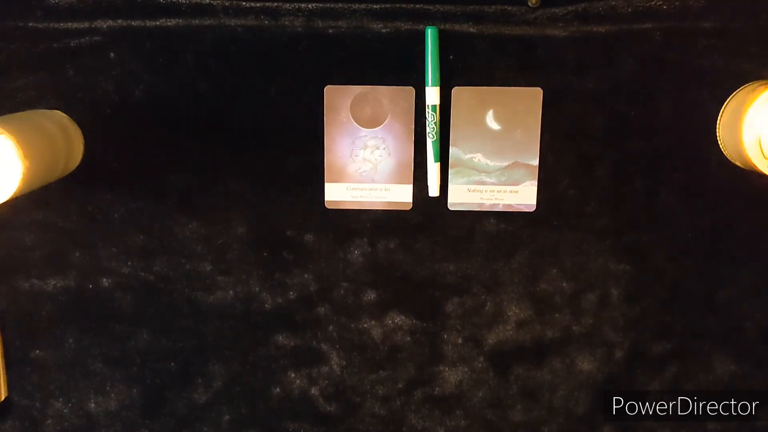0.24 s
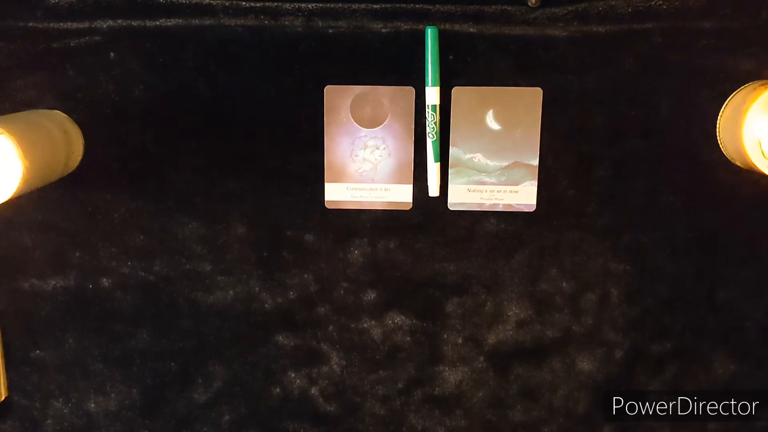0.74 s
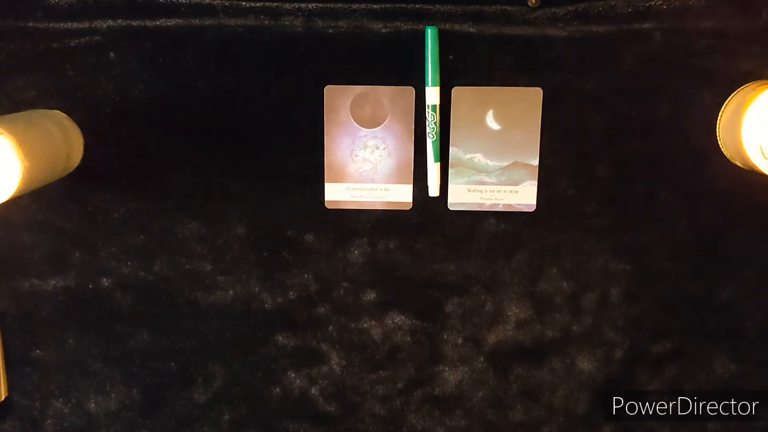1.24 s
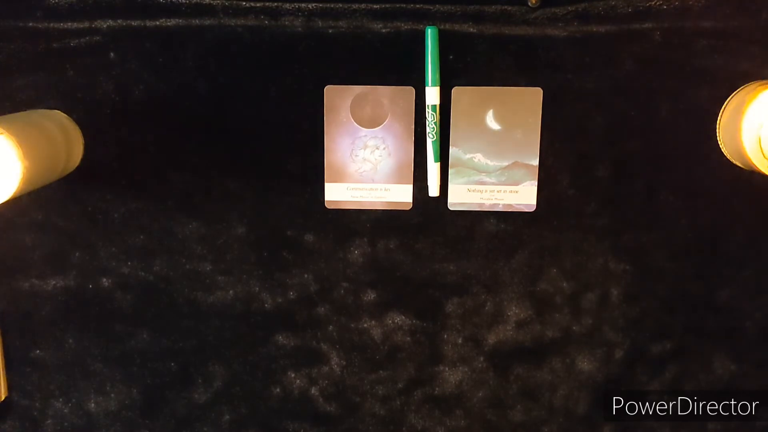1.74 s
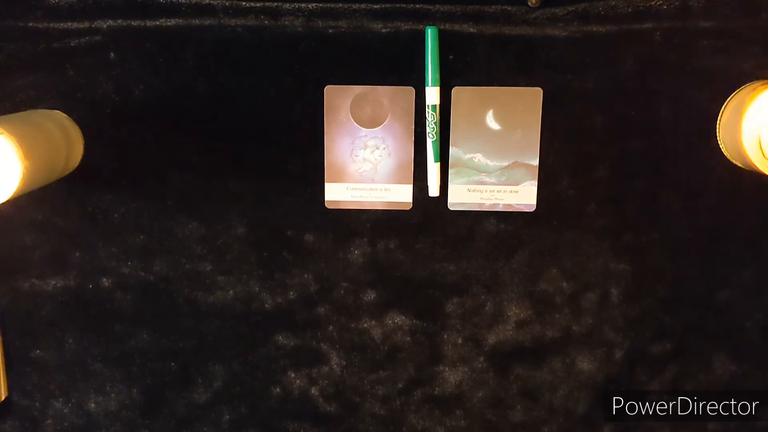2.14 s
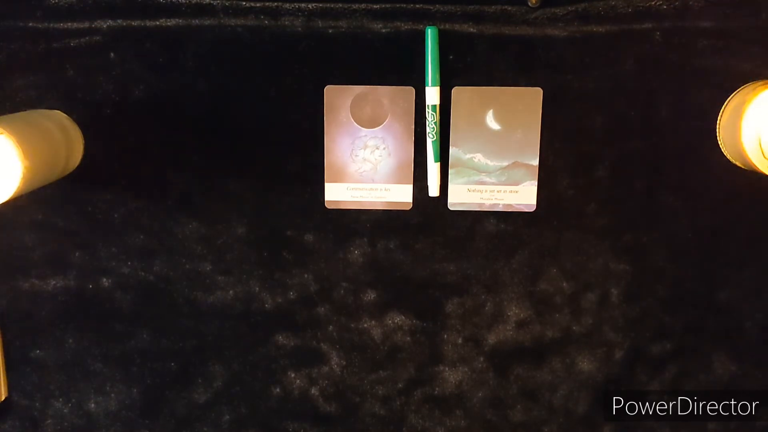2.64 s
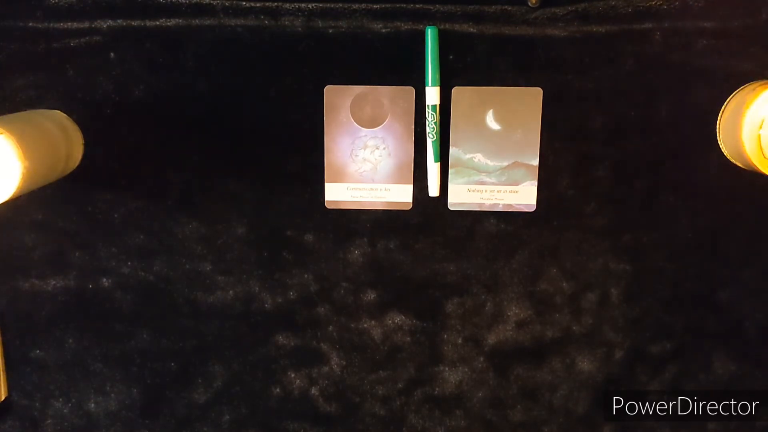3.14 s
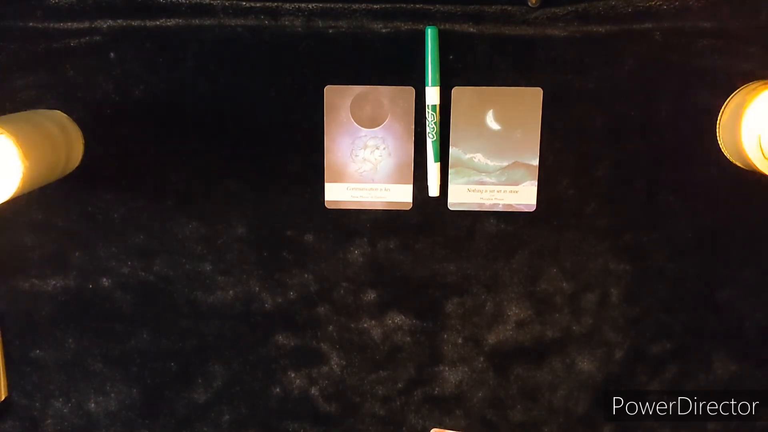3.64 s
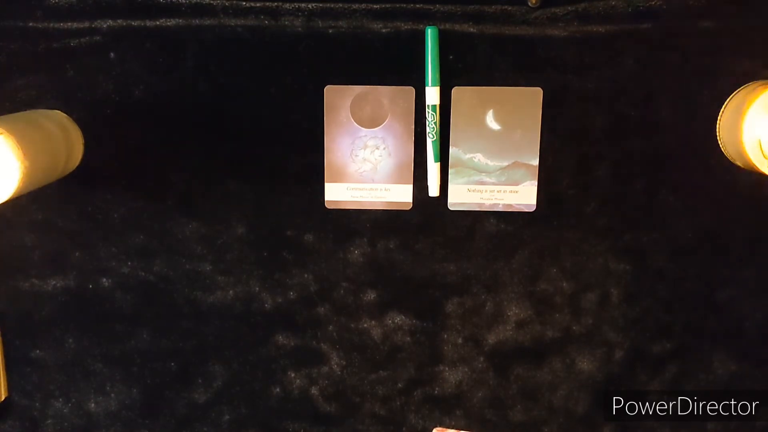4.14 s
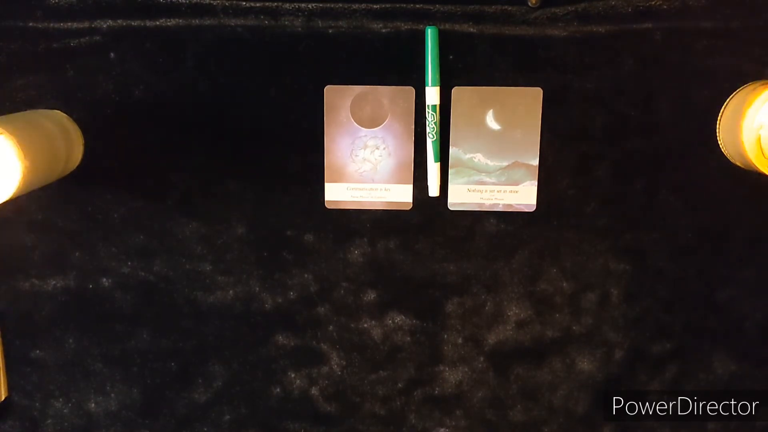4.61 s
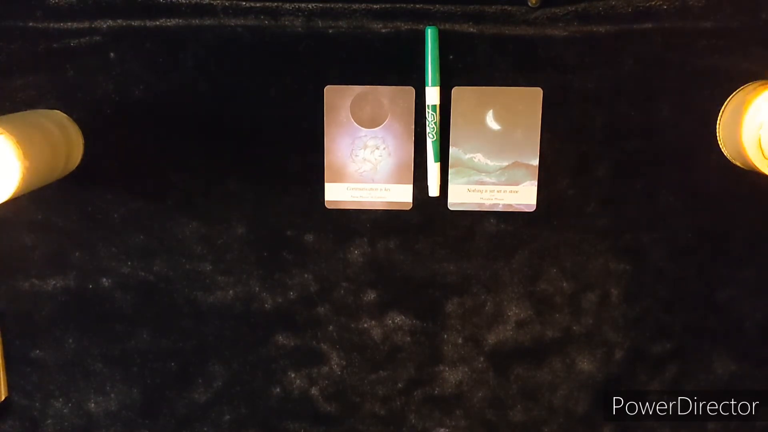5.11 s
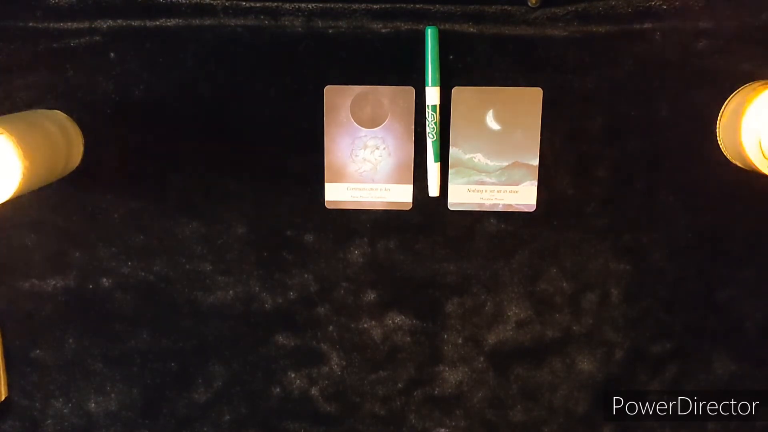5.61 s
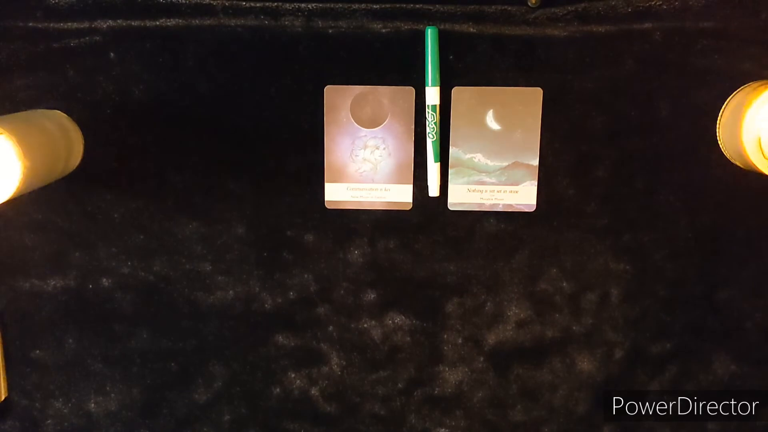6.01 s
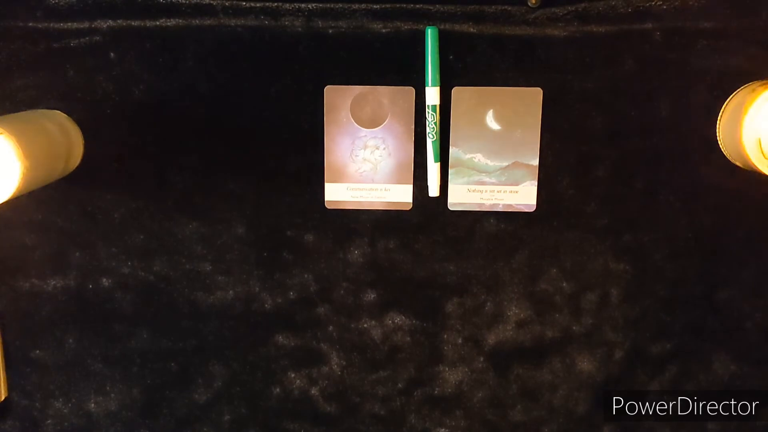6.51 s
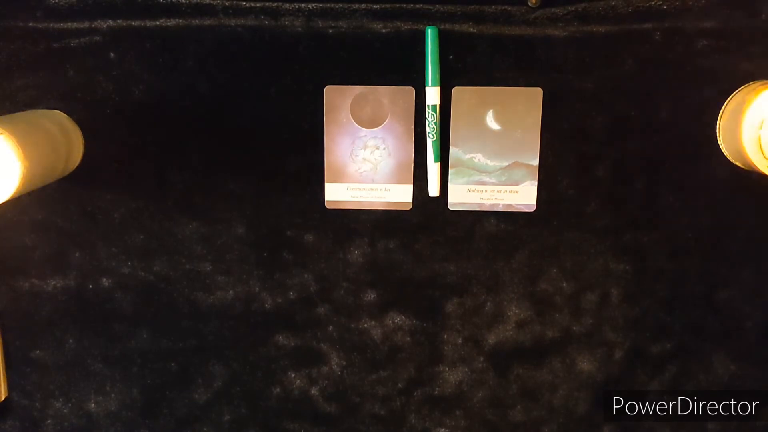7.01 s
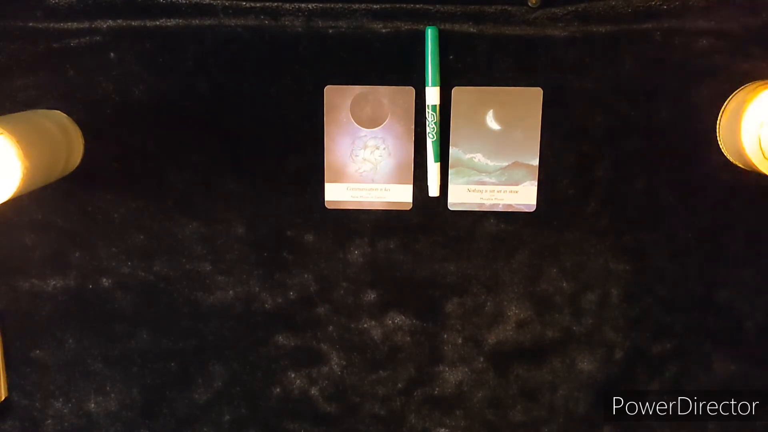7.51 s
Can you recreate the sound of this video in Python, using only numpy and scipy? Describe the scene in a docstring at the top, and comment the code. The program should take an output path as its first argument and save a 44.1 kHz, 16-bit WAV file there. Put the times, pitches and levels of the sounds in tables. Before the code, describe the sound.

Hands shuffle cards very near a two-sided microphone. Quiet rustling and isolated edge ticks come first, over a low ventilation murmur. Midway a burst of bright, irregular ticks riffles past, followed by a sliding push and flat slaps. After a soft thump and light brushing, muffled puffs of air wobble between left and right while the deck is squared with dull wooden knocks on a cloth-covered table. The small room gives a short, dry reverberation.

```python
"""A deck of cards is shuffled by hand in a quiet furnished room, close to a two-port microphone.
Throughout, a ventilation murmur with a faint hum lies below; fingers brush the cards and air puffs at the ports.
Lone edge snaps, rubbed and slapped faces and a light knock lead into a dense riffle: edges tick, packets drop
and slide together. A soft hand lands, more puffs swing the membranes, and three knocks square the deck.
Ticks and knocks are clicks into resonances, friction is stuttering noise, puffs and the hand are short sine swells."""
import sys
import numpy as np
from scipy import signal
from scipy.io import wavfile

SR = 44100
rng = np.random.default_rng(int(sys.argv[2]) if len(sys.argv) > 2 else 0)


def wrap_up_sound(samples):
    """Save the sound to the file named by the first command line argument, as 16-bit audio."""
    columns = np.atleast_2d(samples).T
    # keep every value between -1 and 1, then stretch to whole-number steps
    tamed = np.clip(columns, -1, 1)
    steps = np.round(tamed * 32767).astype(np.int16)
    wavfile.write(sys.argv[1], SR, steps)


N = 342216   # samples
# Levels in the event tables are set before each layer's own trim.


def from_db(db):
    """Decibels to gain."""
    return 10 ** (np.asarray(db) / 20)


def rms_one(x):
    """Scale to rms 1."""
    return x / np.sqrt(np.mean(x ** 2) + 1e-20)


def in_time(rows):
    """Interpolate the columns of a curve at every sample; the first column is t/s."""
    t, *columns = np.transpose(rows)
    return [np.interp(np.arange(N) / SR, t, column) for column in columns]


def in_span(table):
    """Follow the columns of a table; the first, in dB, drops to silence just outside it."""
    first, last = table[0], table[-1]
    before = (first[0] - .04, -120, *first[2:])
    after = (last[0] + .04, -120, *last[2:])
    return in_time([before, *table, after])


def at_hz(points, hz):
    """Read a spectrum on a log frequency axis."""
    f, value = np.array(points).T
    return np.interp(np.log(hz), np.log(f), value)


def drift(rate_hz):
    """Slow noise of spread 1, low-passed by two equal poles at rate_hz."""
    pole = np.exp(-80 * np.pi * rate_hz / SR)   # made at SR / 40, then interpolated
    white = rng.standard_normal(N // 40 + 2002)
    slow = signal.lfilter([1], [1, -2 * pole, pole * pole], white)[2000:]
    return np.interp(np.arange(N) / 40, np.arange(len(slow)), rms_one(slow))


def body(x, modes, turn=-1):
    """Parallel resonances, mode k weighted by turn ** k; a unit click peaks at 1."""
    def bank(v):
        out = 0
        for k, (hz, width_hz, level_db) in enumerate(modes):
            r = np.exp(-np.pi * width_hz / SR)
            poles = [1, -2 * r * np.cos(2 * np.pi * hz / SR), r * r]
            ring = (1 - r * r) * signal.lfilter([1, 0, -1], poles, v + 1e-18)
            out = out + turn ** k * from_db(level_db) * ring
        return out
    unit_click = np.eye(1, 2000)[0]
    return bank(x) / np.abs(bank(unit_click)).max()


def clicks(seconds, level_db, contact_ms):
    """Contacts: a click, then a dying scatter that differs at each port; longer contact blunts the click."""
    out, at = np.zeros((2, N)), np.round(seconds * SR).astype(int)
    step = np.arange(500)
    contact_ms = np.clip(contact_ms + 0 * seconds, 1e-3, 4)[:, None, None]
    luck = rng.standard_normal((len(at), 3, len(step)))
    own, shared = luck[:, :2], luck[:, 2:]
    touch = .3 * (own + shared) * np.exp(-step / (contact_ms * SR / 1000))
    touch[:, :, :1] = np.sign(shared[:, :, :1]) / (1 + 2 * contact_ms)
    for ch in range(2):
        np.add.at(out[ch], at[:, None] + step, from_db(level_db)[:, None] * touch[:, ch])
    return out


def strokes(seconds, level_db, rise_s, fall_db_per_s):
    """Gain of strokes that swell by 29.5 dB over their rise, peak, and fade at a common rate."""
    t, power = np.arange(0, N + 32, 32) / SR, 0
    for s, peak_db, rise in zip(seconds, level_db, rise_s):
        before_db = 29.5 * (s - t) / max(rise, 1e-3)
        after_db = fall_db_per_s * (t - s)
        power = power + from_db(2 * (peak_db - np.maximum(before_db, after_db)))
    return np.interp(np.arange(N) / SR, t, np.sqrt(power))


def swell(start_s, hz, rise_s, phase):
    """A few sine swings that rise softly and die away."""
    out, since = np.zeros((2, N)), np.arange(SR // 4) / SR
    at = round(start_s * SR)
    envelope = (since / rise_s * np.exp(1 - since / rise_s)) ** 2
    out[:, at:at + len(since)] = envelope * np.sin(2 * np.pi * hz * since + phase)
    return out


# How alike the two ports hear noise: f/Hz, left-right correlation [-1 to 1]
PORT_LIKENESS = [(60, 1), (130, 0.63), (290, 1), (640, 0.7), (1400, 0), (3100, 0.22), (15000, 0)]


def stereo_bands(length, shape):
    """Half-octave bands of stereo noise, their width set by PORT_LIKENESS, each weighted by shape(hz)."""
    out, edges = 0, 28 * 2 ** np.arange(0, 9.6, .5)
    white = rng.standard_normal((2, 2, length + 4000))
    for k, (low, high) in enumerate(zip(edges, edges[1:])):
        centre = np.sqrt(low * high)
        band = signal.butter(2, [low, high], "band", fs=SR, output="sos")
        mid, side = signal.sosfilt(band, white[k % 2])[:, 4000:]
        alike = np.clip(at_hz(PORT_LIKENESS, centre), -1, 1)
        stereo = np.sqrt(1 + alike) * mid + np.sqrt(1 - alike) * side * [[1], [-1]]
        out = out + shape(centre) * stereo
    return out


# Colour of the ventilation air: f/Hz, relative level/dB [per Hz]
AIR_SPECTRUM = [(30, -18.5), (50, -5), (86, -13), (125, -6), (167, -42.5), (200, -6), (298, -4), (455, -9),
                (620, -8), (900, -26.5), (1700, -21), (2600, -36.5), (6000, -39.5), (15500, -49)]
AIR_DB = -54
HUM_HZ, HUM_WAVER_DB, HUM_DB = 119.3, 3.5, -63.5


def murmur():
    """Ventilation: air noise that flickers a little band by band, over a sine hum wavering in phase and level."""
    air = rms_one(stereo_bands(N, lambda hz: from_db(at_hz(AIR_SPECTRUM, hz) + 1.4 * drift(28))))
    tone = np.sin(2 * np.pi * HUM_HZ * np.arange(N) / SR + 0.52 * drift(2.3))
    hum = tone * from_db(HUM_WAVER_DB * drift(4.2))
    return from_db(AIR_DB) * air + from_db(HUM_DB) * hum


# Faint rustle of the deck held in the hands: t/s, level/dB
HOLD_RUSTLE = [(0, -81), (1.86, -108), (2.05, -68.5), (2.6, -72), (2.85, -73), (3.05, -69), (3.45, -75),
               (5.45, -67), (5.7, -77), (6.05, -73), (6.45, -65.5), (6.62, -75), (7.48, -77.5),
               (7.62, -62.5), (7.76, -62)]
# Fingers brushing the cards, one stroke a row: t/s [of the peak], level/dB, rise [s]
BRUSH_STROKES = [(0.002, -61, .02), (0.17, -64, 0.12), (0.512, -67, 0.043), (0.69, -62, 0.044),
                 (0.86, -73, .02), (0.948, -51, 0.0024), (1.074, -64, 0.077), (1.796, -53.5, 0.41),
                 (2.03, -61, 0.28), (2.33, -57.5, 0.16), (2.405, -48.5, 0.051), (2.445, -57, 0.056),
                 (2.642, -54.5, 0.28), (3.194, -51, 0.026), (3.24, -79, .06), (3.46, -56, 0.022),
                 (5.383, -55, 0.011), (5.603, -49.5, 0.13), (5.844, -58.5, 0.073), (5.91, -55, 0.11),
                 (6.21, -58.5, 0.12), (6.269, -60, 0.026), (6.51, -52.5, 0.11), (7.584, -66, 0.051)]
# Packets dropping onto the deck with a short slide:
# t/s [of the peak], hiss level/dB, rise [s], packet weight level/dB [against the hiss]
PACKET_DROPS = [(3.638, -58, 0.089, 29), (3.69, -51.5, .03, 22.5), (3.759, -49, 0.073, 6.5),
                (3.819, -44, .03, 10.5), (3.901, -44.5, 0.044, 1.5), (3.97, -33.5, .05, -17),
                (4.006, -39, 0.014, 9), (4.121, -28, 0.00291, -2), (4.172, -36.5, .05, -6.5),
                (4.256, -38, .01, 6), (4.35, -46, 0.084, 16), (4.555, -42.5, 0.088, -33),
                (5.223, -61.5, 0.017, 17)]
# One long slide as the deck is pushed together: t/s, hiss level/dB, packet weight level/dB [against the hiss]
LONG_SLIDE = [(4.6, -52, -15), (4.75, -40, -20), (4.82, -49.5, 7), (4.89, -41.5, -2), (4.92, -41.5, 3),
              (5.022, -36.5, -8.5), (5.11, -41, -7), (5.208, -35, -10), (5.26, -66, -17), (5.33, -84, -6)]
# Colour of rubbed card: f/Hz, relative level/dB [per Hz]
PAPER_SPECTRUM = [(530, -38.5), (900, -2), (1330, -4.5), (2060, -6), (2630, -8.5), (14800, -9.5),
                  (15900, -19), (16500, -72.5)]
# Modes of a card face, also used by snaps and knocks: f/Hz, width [Hz], level/dB
FACE_MODES = [(2850, 260, 0.5), (1355, 570, 1), (3630, 4300, -2)]
# Modes of a packet in the hand, also used by snaps: f/Hz, width [Hz], level/dB
PACKET_MODES = [(292, 70, 4), (580, 141, 2.5), (840, 396, -1)]
BRUSH_FALL_DB_PER_S, DROP_FALL_DB_PER_S = 280, 319.5


def slide():
    """Friction: papery hiss stutters with tiny slips; pressure also stirs face, packet and table."""
    hiss_db, weight_db = in_span(LONG_SLIDE)
    s, drop_db, rise_s, drop_weight_db = np.transpose(PACKET_DROPS)
    hiss = from_db(hiss_db) + strokes(s, drop_db, rise_s, DROP_FALL_DB_PER_S)
    drop_weight = strokes(s, drop_db + drop_weight_db, rise_s, DROP_FALL_DB_PER_S)
    weight = from_db(hiss_db + weight_db) + drop_weight
    brush = strokes(*np.transpose(BRUSH_STROKES), BRUSH_FALL_DB_PER_S)

    # about 400 slips a second, of uneven strength
    slips = (rng.random(N) < 400 / SR) * from_db(5.2 * np.minimum(rng.exponential(1, N), 4))
    stutter = 1 + .5 * rms_one(signal.lfilter([1], [1, -.97], slips))
    noise = stereo_bands(N, lambda hz: from_db(at_hz(PAPER_SPECTRUM, hz)))
    paper = rms_one(noise * stutter * from_db(2.6 * drift(36)))

    catches = slips * (rng.random(N) < .25) * rng.choice([-1, 1], N)   # some slips jolt the whole packet
    rub = rng.standard_normal(N) * from_db(5.9 * drift(22)) + 0.42 * rms_one(catches)
    heavy = rms_one(body(rub, FACE_MODES)) + 0.56 * rms_one(body(rub, PACKET_MODES))
    heavy = heavy + 0.24 * rms_one(body(rub, [(59, 150, 0)]))   # broad low mode of the table

    # a light touch moves no weight; cards shifting in the grip sound duller
    light = signal.sosfilt(signal.butter(1, 3500, "high", fs=SR, output="sos"), paper)
    dull = signal.sosfilt(signal.butter(1, [1800, 9000], "band", fs=SR, output="sos"), paper)
    out = from_db(-9.5) * hiss * paper + from_db(-7.5) * brush * light
    return out + from_db(in_time(HOLD_RUSTLE)[0]) * dull + from_db(-6.5) * weight * heavy


# Puffs of air on the ports: t/s, level/dB, left-right balance [dB]
AIR_PUFFS = [(0.084, -40.5, 19), (0.13, -43, 27), (6.318, -35.5, -25), (6.345, -28.5, -27),
             (6.419, -31, -27), (6.518, -34, -17), (6.552, -32, -9), (6.61, -35, 5), (6.66, -37, 5.5),
             (6.702, -27.5, 14), (6.738, -22.5, 23), (6.756, -25, 13), (6.804, -31, -1), (6.848, -31.5, -8),
             (6.886, -37, -1), (6.921, -28, 4), (6.967, -30, 15), (7.01, -30, 5), (7.052, -37, -8),
             (7.09, -33, -6), (7.21, -42, -3)]
SWING_HZ, SWING_SPREAD = 67.7, 0.3   # spread as a fraction either way
SHARP_ABOVE_DB, SHARP_HZ_PER_DB = -27.5, 15   # the hardest puffs swing faster


def buffet():
    """Each puff swings the membranes a couple of times, out of step at the two ports."""
    out, luck = np.zeros((2, N)), rng.random((len(AIR_PUFFS), 3))
    for (s, level_db, pan_db), (first, gap, pitch) in zip(AIR_PUFFS, luck):
        hz = SWING_HZ * (1 + SWING_SPREAD * (2 * pitch - 1))
        hz = hz + SHARP_HZ_PER_DB * max(level_db - SHARP_ABOVE_DB, 0)
        pan = np.array([[pan_db], [-pan_db]]) / 2 - abs(pan_db) / 2   # only turns the far port down
        phase = 2 * np.pi * np.array([[first], [first + 0.73 * gap]])
        out += from_db(level_db + 3.5 + pan) * swell(s, hz, 0.65 / hz, phase)
    return out


# Card edges snapping free: t/s, level/dB, then against it: face flap level/dB, packet thud level/dB
EDGE_SNAPS = [(0.5054, -72, 17.5, -1), (0.95, -49.5, -2, 0), (1.371, -57, -19, -11),
              (2.8741, -55, 2.5, 19.5), (2.9722, -58.5, 3, 14.5), (3.0396, -66, 11.5, 22),
              (3.19, -54.5, -5, 1), (3.46, -58, 4.5, 4), (3.5102, -64.5, 15.5, 24.5),
              (3.5803, -49, -28, 15), (3.5924, -38.5, -7, 8.5), (3.621, -20, -9, -7),
              (3.6292, -23.5, -5, -38), (3.6846, -35, 7, 14.5), (3.7143, -34.5, -5.5, 7),
              (3.7495, -44.5, 5.5, 18), (3.7601, -45, 7.5, 15.5), (3.8142, -39.5, 6.5, 13),
              (3.845, -39, -5, 2.5), (3.8542, -30, -3.5, 1.5), (3.8871, -7, -19.5, -43),
              (3.924, -15, -40.5, -24.5), (3.9363, -16.5, -10.5, -18.5), (3.9612, -19, -13, -16.5),
              (4.0064, -23, 0.5, 2.5), (4.011, -11.5, -6.5, -42), (4.074, -35.5, -17.5, 8.5),
              (4.12, -11, -16, -21.5), (4.1479, -9, -12, -31), (4.151, -16.5, -12.5, -35),
              (4.16, -19, -13.5, -27), (4.1644, -24.5, -8.5, -29), (4.1669, -7.5, -10.5, -23.5),
              (4.2542, -7, -16.5, -46.5), (4.3212, -19, -7.5, -14), (4.3449, -27.5, -18, 1),
              (4.3521, -14, -11, -23.5), (4.56, -30.5, -27, -23), (4.7439, -34, -26, -1.5),
              (4.8296, -27, -15, -6), (4.9051, -23, -9.5, -14), (5.001, -50, 13.5, 12.5),
              (5.0302, -41.5, 4.5, 5), (5.0751, -30.5, -28, -4.5), (5.1253, -30, -6.5, -5),
              (5.2292, -33.5, 5, 3), (5.268, -43, -17, -15), (5.38, -51.5, 1.5, 12),
              (6.27, -48.5, -23, -24), (6.4972, -59, 9, 14)]
# Modes of a card edge, two low ones, the main one, the thinnest: f/Hz, width [Hz], level/dB
EDGE_MODES = [(4640, 1700, -2), (6700, 890, 0), (8240, 10000, 0), (14300, 18000, 0)]
DULL_DB, DULL_PER_DB = -8.5, 0.1917   # low edge modes at a -30 dB snap; softer snaps sound lower
THIN_TICK_DB, THIN_SPREAD_DB = -2.5, 8   # thinnest tick against the snap, and its random spread


def snaps():
    """A freed edge ticks, the face flaps and the packet thuds; the more face, the longer the slap."""
    s, level_db, face_db, packet_db = np.transpose(EDGE_SNAPS)
    contact_ms = 0.6 + 0.5 * from_db(0.44 * face_db)
    low_db = level_db + DULL_DB - DULL_PER_DB * (level_db + 30)
    thin_db = level_db + THIN_TICK_DB + THIN_SPREAD_DB * rng.standard_normal(len(s))
    low = body(clicks(s, low_db, contact_ms), EDGE_MODES[:2])
    edge = body(clicks(s, level_db - 5.0, contact_ms), EDGE_MODES[2:3])
    edge = body(edge, EDGE_MODES[2:3])   # passing twice, it builds up over a few cycles
    thin = body(clicks(s, thin_db, contact_ms), EDGE_MODES[3:])
    face = body(clicks(s, level_db + face_db + 4.5, contact_ms), FACE_MODES)
    packet = body(clicks(s, level_db + packet_db + 0.5, 0), PACKET_MODES)
    return low + edge + thin + face + packet


# Flat faces rubbing together: t/s [of the peak], level/dB, rise [s]
FACE_RUBS = [(2.36, -65.5, 0.18), (2.44, -67, .1), (4.97, -58, .1), (5.02, -55, 0.057), (5.235, -65, .02),
             (7.7, -61, .2)]
# Whole cards slapping flat on the deck: t/s, level/dB
CARD_SLAPS = [(2.405, -42), (3.8435, -27.5), (4.709, -38.5), (4.748, -47), (4.968, -35), (5.008, -32),
              (5.015, -38), (5.2196, -26.5), (5.2242, -30.5), (5.233, -42), (5.241, -54)]
# Modes of a flat card on the deck: f/Hz, width [Hz], level/dB
FLAT_MODES = [(1680, 520, 3.5), (2430, 320, -2)]


def flats():
    """Cards slap and rub face to face and sound their dull flat modes."""
    grit = rng.standard_normal((2, N)) * from_db(2.7 * drift(40))
    pressure = strokes(*np.transpose(FACE_RUBS), DROP_FALL_DB_PER_S)
    rub = pressure * rms_one(body(grit, FLAT_MODES))
    return body(clicks(*np.transpose(CARD_SLAPS), 0.7), FLAT_MODES) + rub


# Deck knocked on the table, once lightly, later three times to square it: t/s, level/dB,
# then against it: crack, low modes, middle modes, hollow mode, top modes [each level/dB]
DECK_KNOCKS = [(2.8759, -50.5, 4.5, 9, -3, 4, 10.5), (6.784, -34.5, -6, 11, 7.5, 5, -2),
               (7.009, -13.5, -33.5, -13, -19.5, -36, -18), (7.251, -19.5, -25.5, -11.5, -5, -30, -14.5)]
# Modes of the table top, also used by hand_thud: f/Hz, width [Hz], level/dB
TABLE_MODES = [(131, 12, -9), (269, 88, 1), (509, 30, 2.5), (562, 25, 1), (616, 58, -1.5), (704, 130, 0),
               (865, 68, 4.5), (934, 47, 5), (1010, 58, 6.5), (1088, 31, -1), (1146, 23, 2),
               (980, 320, -20), (1290, 50, 1), (1674, 70, 6.5)]


def knocks():
    """The deck's edge meets the table: each blow shares its force out over the modes, the cards crack."""
    s, level_db, crack_db, low_db, mid_db, hollow_db, top_db = np.transpose(DECK_KNOCKS)
    crack = clicks(s, level_db + crack_db, 0.047)
    out = from_db(13) * signal.lfilter([1, -.1], [1, -.35], crack)
    out = out + from_db(20.5) * body(crack, FACE_MODES[1:])
    soft = signal.butter(4, 1950, fs=SR, output="sos")   # the cloth on the table cushions the blow
    shares = [(TABLE_MODES[:2], low_db), (TABLE_MODES[2:5], mid_db), (TABLE_MODES[5:6], hollow_db),
              (TABLE_MODES[6:12], 0), (TABLE_MODES[12:], top_db)]
    for modes, share_db in shares:
        push = np.abs(clicks(s, level_db + share_db, 0))
        out = out + signal.sosfilt(soft, body(push, modes, turn=0.92))   # all modes in step
    return out


def hand_thud():
    """A soft hand lands on the table: a short swell at one of the table's low modes."""
    return from_db(-33.5) * swell(5.598, TABLE_MODES[1][0], 0.0073, 0)


# Decay time of the furnished room: f/Hz, time to fall 60 dB [s]
ROOM_DECAY = [(150, 0.38), (600, 0.26), (2000, 0.19), (6000, 0.23), (14000, 0.17)]
FIRST_WALL_S = 0.0033   # echoes fade in over this time


def room(x):
    """Dense echoes with a decay set per band; the hands move, so three patterns take turns every 1/16 s."""
    t, out = np.arange(SR // 2) / SR, 0
    place = np.arange(N) // (SR // 16) % 3
    for k in range(3):
        echoes = stereo_bands(len(t), lambda hz: from_db(-60 * t / at_hz(ROOM_DECAY, hz)))
        echoes = echoes * np.clip(t / FIRST_WALL_S, 0, 1) ** 2
        echoes = echoes / np.sqrt(np.sum(echoes ** 2) / 2)
        out = out + signal.fftconvolve(x[None] * (place == k), echoes, axes=1)[:, :N]
    return out


SNAP_ROOM_DB, RUB_ROOM_DB, TABLE_ROOM_DB = -2.5, -1, -1   # sends to the room
RIGHT_LAG = 5   # samples


def scene():
    """Mix the layers; the hands are nearer the left port, so direct sound reaches the right one later."""
    ticks, rubbing, table = snaps(), slide() + flats(), knocks()
    left, right = ticks + rubbing + table
    direct = np.array([left, np.roll(right, RIGHT_LAG)])
    send = from_db(SNAP_ROOM_DB) * ticks + from_db(RUB_ROOM_DB) * rubbing + from_db(TABLE_ROOM_DB) * table
    return direct + room(send.mean(axis=0)) + hand_thud() + buffet() + murmur()


def record(dry):
    """The bass is cut below 42 Hz, the highest peaks overload, the top is cut from 16.4 kHz."""
    bass_cut = signal.butter(4, 42, "high", fs=SR, output="sos")
    top_cut = signal.cheby2(14, 60, 16400, fs=SR, output="sos")
    return signal.sosfilt(top_cut, np.clip(signal.sosfilt(bass_cut, dry), -1, 1))


dry = scene()
out = record(dry)
wrap_up_sound(out)
```